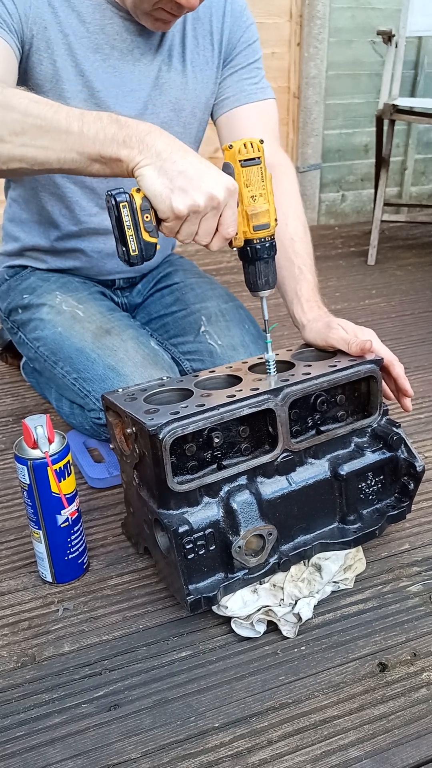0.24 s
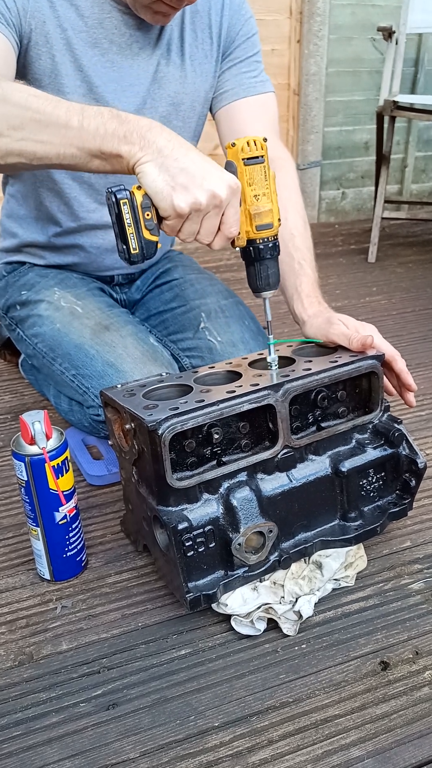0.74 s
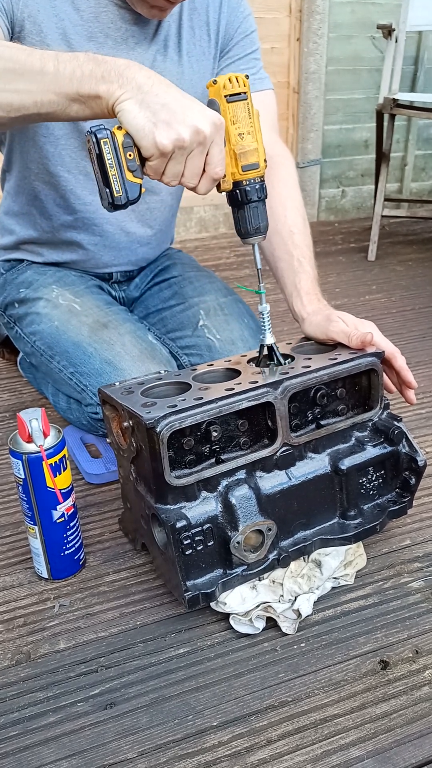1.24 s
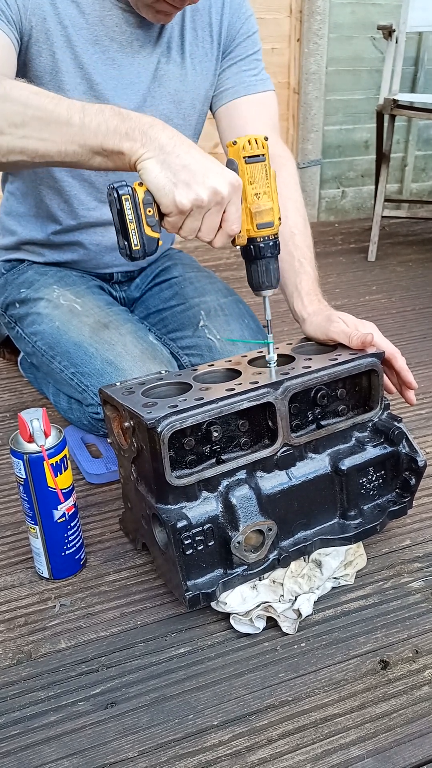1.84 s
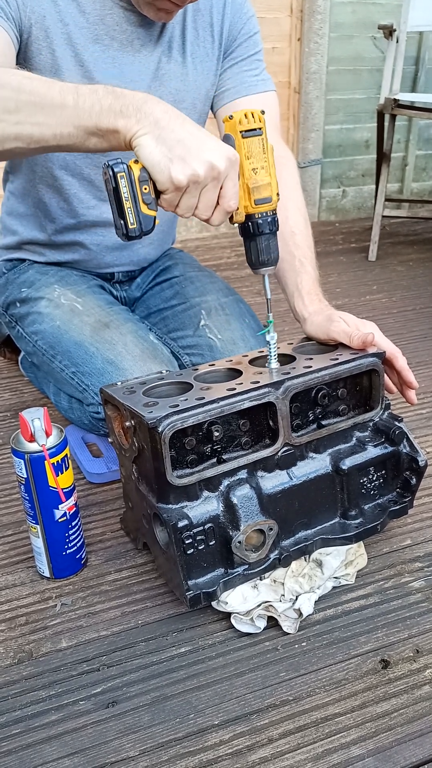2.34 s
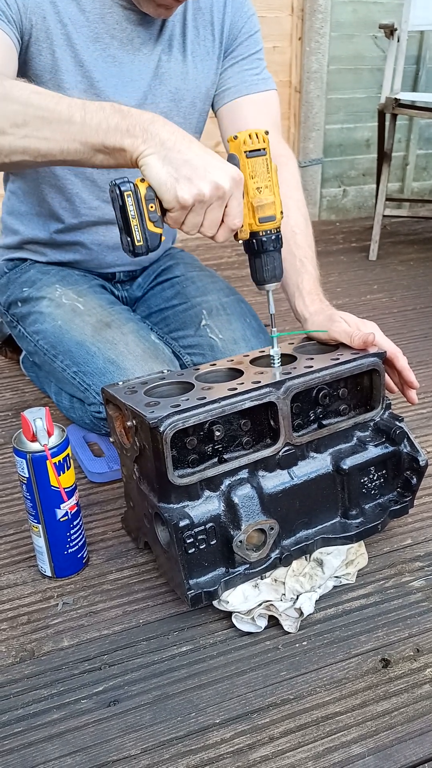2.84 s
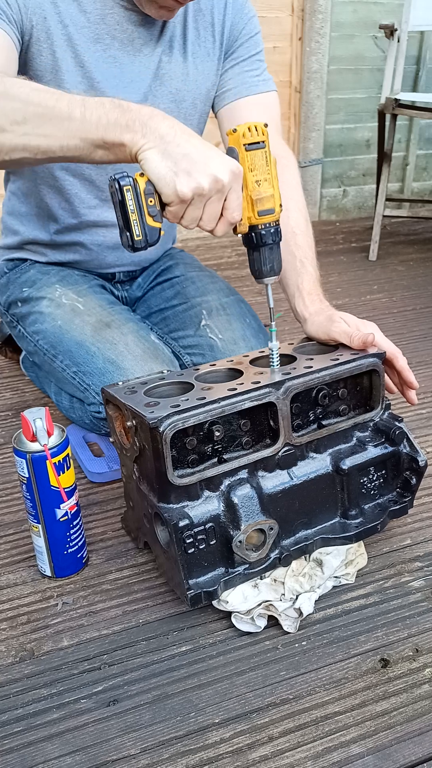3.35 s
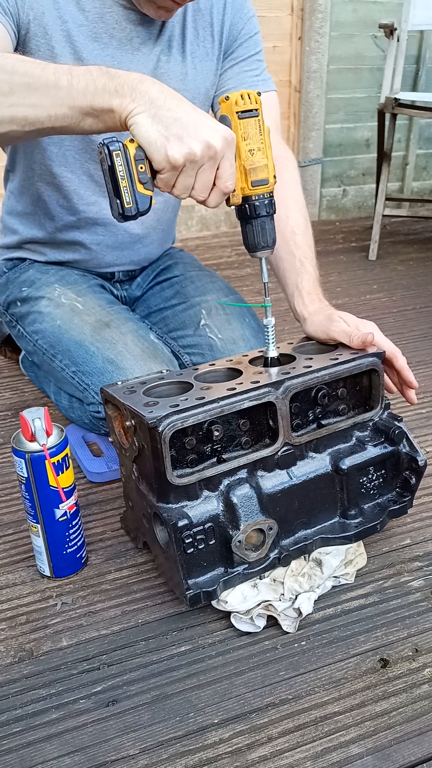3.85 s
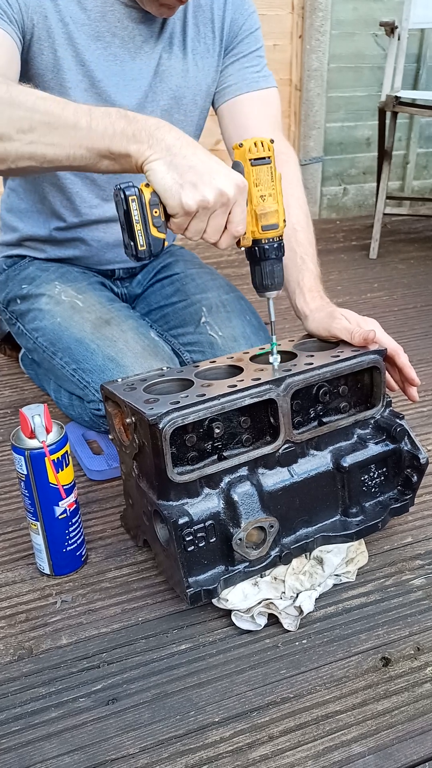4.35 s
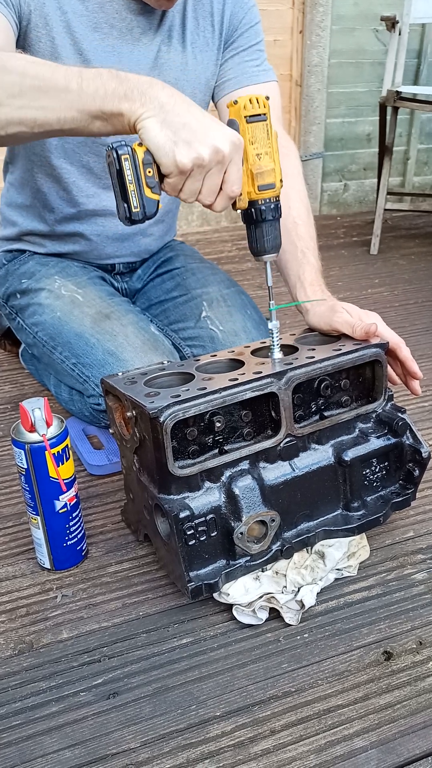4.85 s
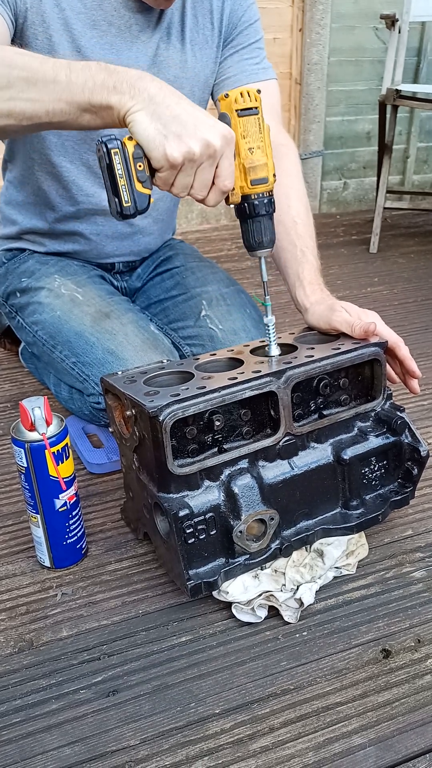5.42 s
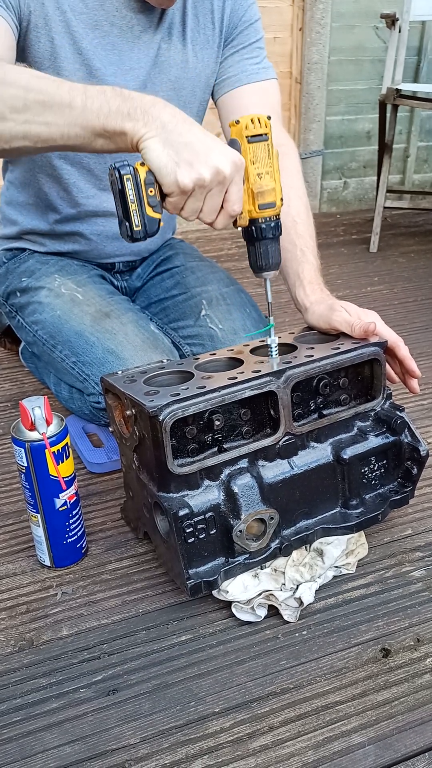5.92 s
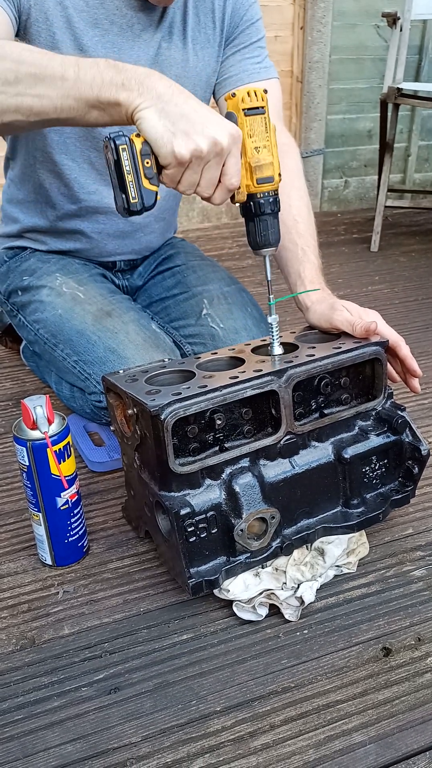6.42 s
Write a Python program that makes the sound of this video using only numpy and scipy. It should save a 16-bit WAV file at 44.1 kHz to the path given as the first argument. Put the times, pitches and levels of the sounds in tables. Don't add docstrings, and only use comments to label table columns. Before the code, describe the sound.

A cordless drill spins honing stones inside an iron engine block, about a metre away on an outdoor wooden deck. The whine drops almost at once, fades to a coast, then climbs within a second and holds high. Gritty, hissing scrape continues throughout, swelling as the tool strokes. It later settles slightly lower in pitch. Faint breeze and distant traffic rumble lie beneath.

```python
import sys
import numpy as np
from scipy import signal
from scipy.fft import rfft, irfft, next_fast_len
from scipy.io import wavfile
from scipy.ndimage import uniform_filter1d

SR = 44100
rng = np.random.default_rng(int(sys.argv[2]) if len(sys.argv) > 2 else 0)


def ratio(d):
    e = np.asarray(d, float) / 20
    return 10 ** e


def master_out(mix):
    frames = np.transpose(np.atleast_2d(mix))
    ceiling = np.clip(frames, -1, 1)
    pcm = np.round(ceiling * 32767).astype(np.int16)
    wavfile.write(sys.argv[1], SR, pcm)


N = 294588
SIZE = next_fast_len(N)
HZ = np.maximum(np.arange(SIZE // 2 + 1) * SR / SIZE, 1)

# time in seconds, speed in Hz.
SHAFT_SPEED = [(0, 75.7), (.11, 75), (.2, 54), (.43, 13), (.76, 52.5), (.93, 62.4), (1.11, 67.9),
               (1.2, 75.2), (1.34, 81), (1.65, 85.4), (2.8, 86.3), (4.32, 88.4), (4.46, 86.4), (4.62, 84.6),
               (4.8, 78.4), (5.05, 74.2), (5.4, 70.6), (6.68, 71.2)]
# start in seconds, length in seconds,
# whip in dB, speed gain in Hz.
STROKE_TOPS = [(1.6, 0.16, 6, 0.17), (1.9, 0.23, 12, 0.11), (2.22, .22, 8.5, 1.1), (3.03, 0.49, 11.5, .9),
               (3.9, 0.5026, 9.5, 0.29), (5.5, .45, 0, 1.04), (5.95, .27, 5, 1.6), (6.52, .3, -1, 0.61)]
# start in seconds, length in seconds, level in dB.
BITES = [(2.44, .38, 10), (3.08, .27, 13), (3.47, .2, 8), (3.72, .42, 9), (4.44, .3, 9), (5.12, .27, 15),
         (6.03, .33, 10)]
# start in seconds, length in seconds, level in dB.
MAIN_DIPS = [
    (.74, .1, -5),
    (1.36, .19, -6),
]
COAST_START_S, COAST_END_S, RESTART_S = 0.24, 0.732, 0.602

MAIN_ORDERS = [9, 12, 8, 6]
MAIN_DB = [0, 0.5, -5.5, -15]
# centre in Hz, width in Hz, gain in dB.
SHELL = [(529, 23, 8), (645, 10, 15.5), (698.3, 25.5, 19), (785.2, 32.6, 25), (880, 76, 13.5)]
SHELL_DB, SHELL_TOP_DB, COAST_DB = -78, -5.5, -38
SHELL_LOW_HZ, SHELL_TOP_HZ = 503, 937
TORQUE_DB_PER_HZ_S, TORQUE_TOP_HZ = 0.0866, 880

POLE_ORDERS = [7, 10, 11, 13, 15, 18, 19, 20, 21, 24, 25, 26, 27, 30]
POLE_DB = [-116, -75.5, -85.5, -78, -75.5, -73.5, -87, -78.5, -84.5, -76, -75.5, -83.5, -90, -79.5]
GEAR_ORDERS = [10.82, 13.82, 22.28, 55.36]
GEAR_DB = [-73, -79, -78, -81]
# centre in Hz, width in Hz, gain in dB.
HOUSING = [(795, 17, 14), (978, 140, 11), (1306, 74, 16), (1870, 83, 18.5), (2410, 100, 20.5),
           (3990, 60, 24)]
MESH_ORDERS = [21.65, 33.08, 44.56]
MESH_DB = [-69, -66, -64.5]
# centre in Hz, width in Hz.
MESH_SHELL = [(1890, 330), (2370, 103), (3900, 250)]

CHOP_HZ, CHOP_UNDER_DB, CHOP_BITE = 3958, -10.3, .1
CHOP_OFF_S, CHOP_ON_S = .22, .4
# multiple of chop pitch, multiple of shaft speed; then level in dB.
CHOP_SIDES = [(1, -3), (1, 3), (1, 6), (2, 0), (2, -6), (2, -12), (2, -3), (2, 3)]
CHOP_SIDE_DB = [-13, -19, -14, -17, -11, -17, -24, -25]
# start in seconds, length in seconds, tone in dB, octave sidebands in dB.
SPIN_UP_WHINE = [
    (.42, .36, 5, 0),
    (.62, .33, 0, 5),
]

# time in seconds, scrape level in dB.
PRESSURE = [(0, -50), (.18, -50), (.28, -55), (.56, -57), (1.45, -57), (1.6, -58.5), (2.29, -57),
            (2.42, -48.5), (2.75, -50.5), (3.37, -48.5), (3.63, -51.5), (3.79, -48), (4.41, -50.5),
            (4.54, -49), (5.77, -51), (6.07, -48), (6.27, -52), (6.62, -48.5)]
# frequency in Hz, level in dB.
STONE = [(330, -44), (480, -26), (700, -16), (1150, -12), (1480, -18.5), (1750, -8.5), (2100, -16.5),
         (2800, -11.5), (3300, -10), (4000, -3.5), (4700, -7), (6000, -4.5), (8200, -13.5), (15700, -21)]
# centre in Hz, width in Hz, gain in dB.
BLOCK = [(782, 220, -7.5), (1005, 38, -1), (1243, 32, -6), (1887, 18, -5.5), (2250, 224, -5.5),
         (2526, 36, -1), (3960, 23, -17), (5190, 23, -2), (5644, 200, -7.5), (6375, 40, -4),
         (7010, 21, -3.5), (7600, 150, -8.5), (8790, 140, -6), (9560, 730, -7.5), (11600, 1430, -4.5)]
SCRAPE_BITE = 0.027
GEARBOX_DB, GEARBOX_COAST_DB = -66, -9
BODY_DB, BODY_COAST_DB, GRIT_DB = -5.5, -6, -3.5

# frequency in Hz, level in dB.
BREEZE = [(20, -16), (45, -34), (68, -0.5), (100, -0.5), (140, -8), (200, -24), (300, -48), (600, -56)]
# start in seconds, length in seconds, level in dB.
GUSTS = [(0.629, 0.49, -70), (1.177, 0.45, -70.5), (1.894, 0.61, -73), (2.987, 0.03, -74),
         (3.791, 0.075, -73), (4.059, 0.038, -74), (4.38, 0.12, -73.5), (4.606, 0.25, -70.5),
         (5.011, 0.21, -73.5), (5.329, 0.22, -71), (5.655, 0.075, -69), (5.791, 0.104, -72),
         (5.992, 0.19, -77), (6.413, 0.06, -77.5)]
# frequency in Hz, density in dB per Hz.
TRAFFIC = [(18, -62), (30, -19), (75, -9.5), (125, -6.5), (265, -6.5), (355, -13), (432, -15),
           (1290, -11.5), (1500, -13), (1950, -34), (3300, -120)]
LULL_DB, TRAFFIC_DB = -83, -75

# frequency in Hz, left minus right in dB.
PORT_DB = [(130, -0.5), (300, -2.5), (500, 11.5), (800, -4.5), (3100, 6), (3900, -10.5), (4600, 2),
           (5200, 2), (5700, -3.5), (6300, 1.5), (9100, -3), (10600, 1.5), (11600, 2.5), (14000, 10)]
# frequency in Hz, left lead in radians.
PORT_LEAD = [(0, .3), (780, 0.38), (1640, 3.5), (1890, 4.7), (3620, 3.98), (3960, 6.1), (6290, 12.77),
             (7060, 19.7), (7920, 21.15), (9220, 24.1), (10300, 31), (11700, 25.6), (14300, 47),
             (15400, 28)]
# frequency in Hz, common share from 0 to 1.
PORT_SHARE = [(60, 0.97), (280, 0.56), (700, 0.35), (1500, 0.16), (4000, 0.49), (8000, 0.13),
              (15000, 0.058)]
DECK_ECHO_MS, DECK_ECHO = .98, .45
TOP_HZ = 15715


def curves(table):
    s, *columns = np.transpose(table)
    return [np.interp(np.arange(N) / SR, s, c) for c in columns]


def across(table, hz=HZ):
    f, v = np.transpose(table)
    return np.interp(np.log(hz), np.log(np.maximum(f, 1)), v)


def walk(rate_hz):
    k = int(SR / rate_hz)
    held = np.repeat(rng.standard_normal(N // k + 1), k)
    return 1.42 * uniform_filter1d(uniform_filter1d(held, k), k)[:N]


def swells(rows, column, edge_s, under=0):
    s = np.arange(N) / SR
    edge = int(edge_s * SR)
    held = sum((row[column] - under) * ((s > row[0]) & (s < row[0] + row[1])) for row in rows)
    return uniform_filter1d(uniform_filter1d(held, edge), edge)


def rings(modes, hz):
    return np.sqrt(1 + sum(ratio(db) ** 2 / (1 + (2 * (hz - f) / w) ** 2) for f, w, db in modes))


def ports(near, far=None):
    lead = np.interp(HZ, *np.transpose(PORT_LEAD))
    shadow = ratio(across(PORT_DB) / 2) * np.exp(.5j * lead)
    if far is None:
        return np.array([near * shadow, near / shadow])
    share = np.clip(across(PORT_SHARE), 0, 1)
    common = np.sqrt((1 + share) / 2) * near
    differing = np.sqrt((1 - share) / 2) * far
    return np.array([(common + differing) * shadow, (common - differing) / shadow])


def hiss(gain):
    return gain * ports(rfft(rng.standard_normal(SIZE)), rfft(rng.standard_normal(SIZE)))


def band(spectra, lo_hz, hi_hz):
    mid = spectra.mean(axis=0)[(HZ > lo_hz) & (HZ < hi_hz)]
    return spectra * SIZE / np.sqrt(2 * np.sum(np.abs(mid) ** 2))


def tone(turns, db, waver_db, slip):
    phase = 2 * np.pi * (turns + rng.random()) + slip * walk(25)
    return np.sqrt(2) * ratio(db + waver_db * walk(9)) * np.sin(phase)


def shaft():
    coast = swells([(COAST_START_S, COAST_END_S - COAST_START_S, 1.)], column=2, edge_s=0.07)
    driven_hz = uniform_filter1d(curves(SHAFT_SPEED)[0], SR // 30)
    return driven_hz + swells(STROKE_TOPS, column=3, edge_s=0.084), coast


def strain_db(k, hz):
    hz_per_s = uniform_filter1d(np.gradient(hz) * SR, SR // 10)
    torque_db = TORQUE_DB_PER_HZ_S * np.clip(hz_per_s, 0, 130)
    return torque_db * (k % 3 == 0) / (1 + (k * hz / TORQUE_TOP_HZ) ** 16)


def main_orders(hz, coast):
    turns = np.cumsum(hz) / SR
    dip_db = swells(MAIN_DIPS, column=2, edge_s=0.054)
    out = 0
    for k, db in zip(MAIN_ORDERS, MAIN_DB):
        order_hz = k * hz
        level_db = db + SHELL_DB + strain_db(k, hz) + dip_db + COAST_DB * coast
        level_db += SHELL_TOP_DB / (1 + (SHELL_TOP_HZ / order_hz) ** 30)
        level_db += 20 * np.log10(rings(SHELL, order_hz))
        if k == 6:
            level_db += swells(STROKE_TOPS, column=2, edge_s=.03) + 5.0 * walk(30)
        out = out + tone(k * turns, level_db - 12 * (order_hz < 420), waver_db=.8, slip=.12)
    return out


def poles_and_gears(hz, scrape_db, bite_db):
    turns = np.cumsum(hz) / SR
    unloaded = (COAST_START_S + 0.054, RESTART_S - COAST_START_S - .05, -20)
    load_db = 1.04 * (scrape_db + 47.5) + swells([unloaded], column=2, edge_s=0.053)
    out = 0
    for k, db in zip(POLE_ORDERS, POLE_DB):
        radiated = rings(HOUSING, k * hz) / np.sqrt(1 + (600 / (k * hz)) ** 8)
        out = out + radiated * tone(k * turns, db + load_db + strain_db(k, hz), waver_db=1.8, slip=.25)

    def thin(f):
        return 1 / np.sqrt(1 + (SHELL_LOW_HZ / f) ** 12)

    for k, db in zip(GEAR_ORDERS, GEAR_DB):
        radiated = rings(HOUSING, k * hz) * thin(k * hz)
        out += radiated * tone(k * turns, db + load_db, waver_db=2.5, slip=.6)
    for k, db, (f, w) in zip(MESH_ORDERS, MESH_DB, MESH_SHELL):
        radiated = np.maximum(1 / (1 + (2 * (k * hz - f) / w) ** 2), .2) * thin(k * hz)
        out += radiated * tone(k * turns, db + load_db + bite_db, waver_db=2.5, slip=.7)
    return out


def chopper(hz, scrape_db, bite_db):
    s, turns = np.arange(N) / SR, np.cumsum(hz) / SR
    chop_db = scrape_db + CHOP_UNDER_DB + CHOP_BITE * bite_db + 2.0 * walk(13)
    chop_db += swells(SPIN_UP_WHINE, column=2, edge_s=0.042)
    whine = tone(CHOP_HZ * s, chop_db + 1.2, waver_db=1.6, slip=.3)
    steady_db = uniform_filter1d(chop_db, SR // 3) - 12 * np.log10(np.maximum(hz, 45) / 80)
    octave_db = swells(SPIN_UP_WHINE, column=3, edge_s=.08)
    for (m, k), db in zip(CHOP_SIDES, CHOP_SIDE_DB):
        side_db = steady_db + 3 + db + (m == 2) * octave_db
        whine += tone(m * CHOP_HZ * s + k * turns, side_db, waver_db=2.0, slip=.2)
    powered = 1. * ((s < CHOP_OFF_S) | (s > CHOP_ON_S))
    return whine * uniform_filter1d(powered, SR // 50)


def drill():
    hz, coast = shaft()
    bite_db = swells(BITES, column=2, edge_s=0.028)
    scrape_db = uniform_filter1d(curves(PRESSURE)[0], SR // 5)
    out = main_orders(hz, coast)
    out += poles_and_gears(hz, scrape_db, bite_db)
    out += chopper(hz, scrape_db, bite_db)
    return irfft(ports(rfft(out, SIZE)), SIZE)[:, :N]


def scrape():
    return curves(PRESSURE)[0] + SCRAPE_BITE * swells(BITES, column=2, edge_s=.04) + 0.36 * walk(12)


def hone():
    scrape_db, speed_hz = scrape(), shaft()[0]
    coast = swells([(COAST_START_S + 0.053, RESTART_S - COAST_START_S - .03, 1.)], column=2, edge_s=0.082)
    gears_db = GEARBOX_DB + GEARBOX_COAST_DB * coast - scrape_db + 2.4 * walk(8)
    body_db = BODY_DB + BODY_COAST_DB * coast + 1.3 * walk(13)
    grit_db = GRIT_DB + 0.73 * walk(10)
    block_gain = rings([(f, w, db + 12.5) for f, w, db in BLOCK], HZ)
    spectra = band(hiss(ratio(across(STONE)) * block_gain), 3750, 7900)
    out = 0
    for octave in np.arange(0, 6.1, 1 / 4):
        hz = 300 * 2 ** octave
        window = np.clip(1 - 4 * np.abs(np.log2(HZ / hz)), 0, 1)
        tilt_db = across([(1100, 0.72), (2000, 0.05)], hz) * (gears_db + 13.5)
        tilt_db += across([(1100, 0.52), (2000, 0.86), (3300, 0.13), (4200, 0.18)], hz) * (body_db + 7.0)
        tilt_db += across([(7000, 0.098), (9500, 1)], hz) * (grit_db + 3.5)
        patchy_db = across([(1000, 2.2), (3000, 1.8), (4200, .6)], hz) * walk(18) + 1.2 * walk(36)
        out = out + irfft(spectra * window, SIZE)[:, :N] * ratio(tilt_db + patchy_db)
    shake = 1 + 0.046 * np.sin(2 * np.pi * np.cumsum(speed_hz) / SR)
    return out * ratio(scrape_db + 0.53 * walk(40) + 0.11 * walk(22)) * shake


def traffic():
    rumble = irfft(band(hiss(ratio(across(TRAFFIC))), 30, 600), SIZE)[:, :N]
    return rumble * ratio(TRAFFIC_DB - 1.5 + .8 * walk(4) + 1.6 * walk(14))


def breeze():
    rush = irfft(band(hiss(ratio(across(BREEZE))), 45, 160), SIZE)[:, :N]
    gust_db = LULL_DB + swells(GUSTS, column=2, edge_s=.06, under=LULL_DB)
    return rush * ratio(gust_db + 0.83 * walk(9))


def scene():
    work = rfft(drill() + hone(), SIZE)
    echo = DECK_ECHO / (1 + (HZ / 4000) ** 4) * np.exp(-2j * np.pi * HZ * DECK_ECHO_MS / 1000)
    work = work * np.array([np.ones(len(HZ)), np.abs(1 - echo)])
    return irfft(work, SIZE)[:, :N] + traffic() + breeze()


def top_cut(x):
    return signal.sosfilt(signal.butter(12, 15890, fs=SR, output="sos"), x)


def record(dry):
    cut = irfft(rfft(dry, SIZE) * (HZ < TOP_HZ), SIZE)[:, :N]
    return top_cut(cut)


dry = scene()
out = record(dry)
master_out(out)
```